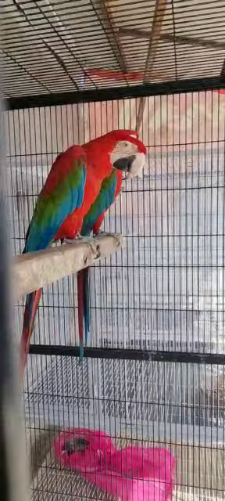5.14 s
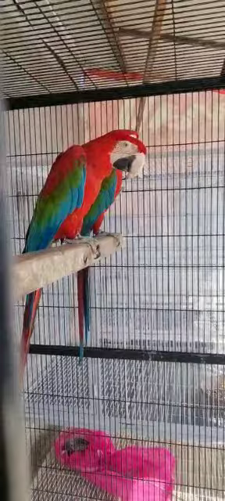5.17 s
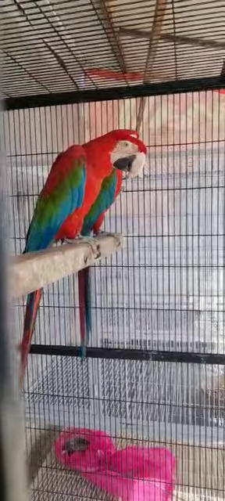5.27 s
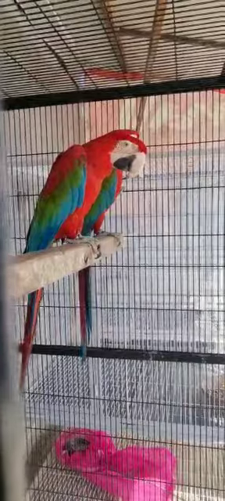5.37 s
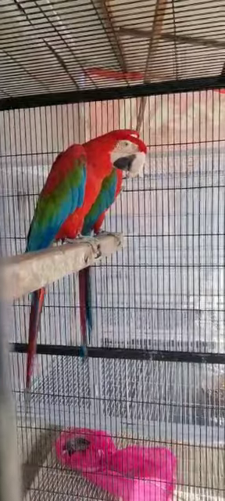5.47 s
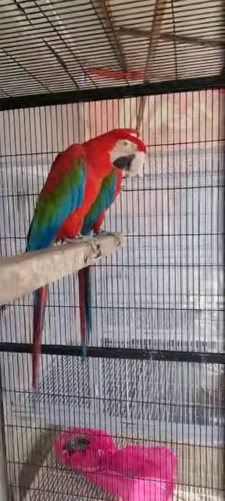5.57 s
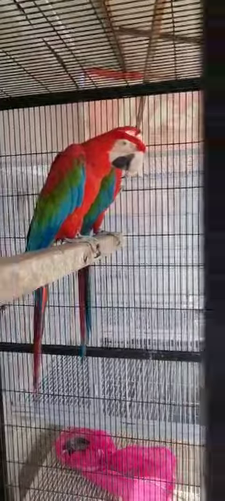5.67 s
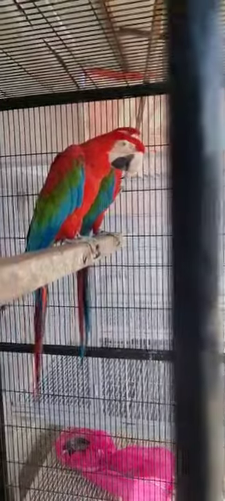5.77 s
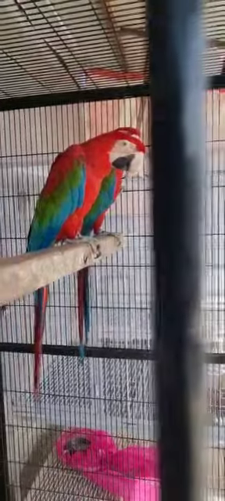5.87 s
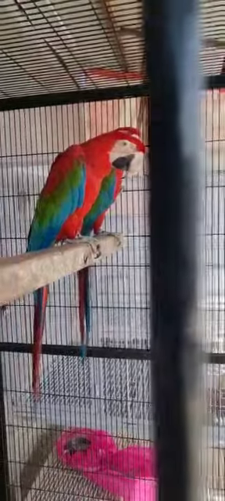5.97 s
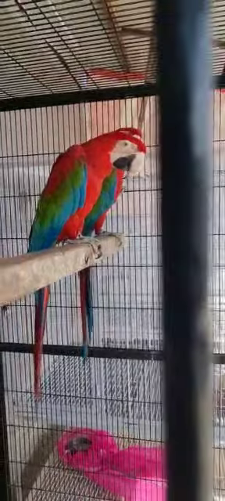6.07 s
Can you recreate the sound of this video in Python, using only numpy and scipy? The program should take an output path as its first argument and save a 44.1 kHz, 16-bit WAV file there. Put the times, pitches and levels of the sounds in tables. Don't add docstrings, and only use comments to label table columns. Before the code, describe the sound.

A large parrot lets out a string of loud, harsh, falling screeches in an echoing wire aviary, with growls, squawks, claw ticks and distant birds.

```python
import sys
import numpy as np
from scipy import signal
from scipy.fft import rfft, irfft, next_fast_len
from scipy.io import wavfile
from scipy.ndimage import map_coordinates

SR = 44100
rng = np.random.default_rng(int(sys.argv[2]) if len(sys.argv) > 2 else 0)


def dump_mix(stems):
    frames = np.atleast_2d(stems).T
    limited = np.clip(frames, -1, 1)
    pcm = np.round(limited * 32767).astype(np.int16)
    wavfile.write(sys.argv[1], SR, pcm)


def invert_db(level):
    return 10 ** (np.asarray(level, dtype=float) / 20)


N = 270769
TIME = np.arange(N) / SR

# (frequency [Hz], left-right correlation [-1 to 1])
PORT_LIKENESS = [(60, 1), (130, 0.73), (290, 0.68), (640, -0.64), (1400, 0.06), (3100, -0.11),
                 (7000, 0.091)]
# (frequency [Hz], t60 [s])
AVIARY_DECAY = [(200, 1), (1000, 0.41), (3000, 0.39), (7000, 0.25), (14000, 0.16)]

# (frequency [Hz], level [dB per Hz])
MURMUR_COLOUR = [(12, -67), (20, -34.5), (49, -21), (302, -4.5), (377, -3.5), (433, -8), (620, -8),
                 (693, -4.5), (753, -7.5), (966, -8.5), (1420, -5.5), (1640, -14.5), (1990, -12),
                 (2410, -12.5), (15000, -46.5)]
# (time [s], level [dB])
MURMUR_LEVEL = [(0, -58), (.8, -58.5), (1.4, -50), (2.6, -53), (3.5, -49), (4.8, -51), (5.13, -60),
                (5.54, -50), (6.14, -55)]
# (frequency [Hz], width [Hz], level [dB])
MOTOR_HUM = (76.2, 20, -59.5)
# (frequency [Hz], width [Hz], level [dB])
CHIRR_BANDS = [(2660, 570, 2), (3880, 300, -1), (5400, 350, 6.5), (6470, 730, 6)]
# (time [s], level [dB])
CHIRR_CRESTS = [(0, -43.5), (.8, -38.5), (1.4, -51), (2.25, -38), (2.6, -30), (3.6, -35), (4.2, -40),
                (5.1, -29)]

# (time [s], length [s], peak level [dB], first pitch [Hz], last pitch [Hz])
WHISTLE_CALLS = [
    (3.463, .1, -22, 3200, 2950),
    (4.165, .09, -22, 3100, 2850),
    (4.875, .105, -20, 2980, 2870),
    (2.8, .07, -28, 4200, 3750),
    (2.87, .2, -33, 1950, 1900),
    (2.835, .13, -25, 3500, 3060),
    (-.1, .25, -45, 1400, 1420),
    (3.85, .45, -45, 1480, 1440),
]
# (second harmonic [dB], pitch unsteadiness [share])
WHISTLE_GRAINS = [(-17, 0.021), (-21, 0.014), (-25, 0.016), (-44, 0.02), (-0.5, 0.073), (-19.5, .015),
                  (-15, 0.03), (-5, .05)]
# (crest [share of length], start under crest [dB], end under crest [dB])
WHISTLE_SWELL = (.45, 20, 12)

# (time [s], peak level [dB], dull band re bright [dB], left-right [dB])
MESH_TICKS = [(0.0807, -50, 7, 1.0), (0.194, -47, 5, 3.0), (0.313, -44.5, 7, 2), (0.632, -49, 6, 2.0),
              (0.6705, -31, -3.5, -4), (0.8213, -60, 23, 1.5), (0.9003, -68.5, 34, -7),
              (1.8992, -54, 19, 12), (2.045, -37.5, -14, 10), (2.1972, -35, 4.5, 3), (2.3001, -48.5, -4, 1),
              (2.4782, -41, 7, -19), (2.8492, -42, 14.5, 0), (3.25, -44, 5, 10), (3.469, -40, 9, -2),
              (3.8076, -34.5, 2, -12), (3.8513, -34, 2, -5), (3.88, -38, 8, -3), (4.11, -46, -5, 0),
              (6.0201, -56, 0, 0)]
# (frequency [Hz], level [dB])
WIRE_BRIGHT = [(7500, -47), (9000, -12.5), (13000, -7.5), (16000, -9.5)]
# (frequency [Hz], level [dB])
WIRE_DULL = [(1200, -23), (2500, -20), (5500, -10), (7200, -12), (8200, -33)]
# (time [s], peak level [dB], t60 [s])
DRY_SNAP = (5.6434, -30, .006)

# (time [s], length [s], peak level [dB], first pitch [Hz], settled pitch [Hz])
CLEAN_SCREECHES = [(1.137, .263, -16.5, 1790, 1395), (1.468, .4, -16.5, 1570, 1385),
                   (2.588, .232, -19.5, 1430, 1375), (2.975, .295, -19, 1480, 1365)]
# (time [s], length [s], peak level [dB], first pitch [Hz], settled pitch [Hz])
TORN_SCREECHES = [(3.497, .44, -20.5, 1380, 1330), (4.188, .41, -19, 1430, 1345),
                  (4.905, .39, -18, 1450, 1355)]
# (time to crest [s], start under crest [dB], fade [dB/s], left-right [dB])
CLEAN_SWELL = (.12, 6, 95, -1)
TORN_SWELL = (.03, 1, 45, 0)
# (time to full rasp [s], first roughness [0-1], full roughness [0-1],
#           half-pitch lines [dB], left lag [samples])
CLEAN_TEARING = (.12, .03, .4, -13, 19)
TORN_TEARING = (.05, .3, .58, -8, -6)
# (frequency [Hz], level [dB])
BEAK_THROAT = [(650, -74), (1100, -22), (1450, -18), (1800, -19), (2360, -3), (2850, -3), (3600, -5),
               (4360, -22.5), (5030, -18), (5730, -12), (9370, -63), (11200, -52), (15000, -35)]
# (frequency [Hz], level [dB])
WIDE_RASP = [(530, -31.5), (900, -55), (1190, -6.5), (1660, -9), (1930, -2.5), (2390, 1.5), (2690, 3),
             (3970, -8.5), (4510, -18), (5390, -12), (6820, -17), (8430, -39.5), (15000, -41)]
# (frequency [Hz], level [dB])
NARROW_RASP = [(530, -61.5), (900, -34), (1410, -26), (1960, -11), (2310, -19), (2720, -1.5), (3130, -10.5),
               (4730, -23), (5580, -25), (7490, -35.5), (8230, -63), (11600, -52), (15000, -55)]

# (time [s], length [s], peak level [dB], first pitch [Hz], last pitch [Hz])
DRONE_CALLS = [(1.38, .57, -44, 470, 500), (2.7, 1.25, -41, 480, 512), (4.0, .6, -42, 580, 620),
               (4.63, .32, -35, 760, 630), (4.94, .75, -27.5, 530, 570), (5.74, .06, -35, 560, 540),
               (5.78, .32, -44, 560, 520)]
# (crest [share of length], start under crest [dB], end under crest [dB])
DRONE_SWELL = (.6, 7, 7)
# (frequency [Hz], level [dB])
FAR_THROAT = [(140, -57.5), (230, -20), (314, -14), (398, -21.5), (490, -3), (777, -5), (1110, 2),
              (1660, -1), (2170, -22.5), (2750, -5), (3230, -26), (4100, -18), (4480, -30), (5360, -17.5),
              (8000, -70), (10400, -75.5), (17600, -120)]
# (time [s], length [s], peak level [dB], crest [share of length], start under crest
# [dB], end under crest [dB])
RINGING_CALL = (5.2, .51, -26, .75, 6, 11)

# (time [s], level [dB], pitch [Hz])
GROWL_CURVE = [(1.82, -42, 335), (1.982, -36, 374), (2.036, -37.5, 312), (2.13, -33, 320),
               (2.166, -33, 376), (2.21, -29, 385), (2.248, -28, 448), (2.27, -34, 437)]
# (time [s], length [s], first pitch [Hz], last pitch [Hz], roughness [0-1])
SQUAWK_PARTS = [
    (2.26, .092, 630, 620, .3),
    (2.345, .071, 580, 550, .12),
    (2.41, .055, 540, 500, .15),
    (2.465, .095, 650, 440, .38),
]
# (time [s], level [dB])
SQUAWK_EFFORT = [(2.26, -38), (2.29, -25), (2.345, -22), (2.37, -18), (2.42, -14.5), (2.46, -21),
                 (2.475, -13), (2.515, -18), (2.56, -36)]
# (time [s], length [s], level [dB], first pitch [Hz], last pitch [Hz])
CLOSING_CALL = (6.085, .055, -27.5, 505, 525)
# (frequency [Hz], level [dB])
GROWL_THROAT = [(120, -73), (200, -21), (333, -7), (475, -17.5), (646, -8.5), (766, -15), (1030, 1),
                (1510, -19), (2980, -16.5), (3530, -35.5), (6250, -34.5), (8000, -54), (10400, -80),
                (17600, -120)]
# (frequency [Hz], level [dB])
CROAK_THROAT = [(180, -49), (300, -17.5), (691, -16.5), (828, -25), (1190, 2), (1540, -8), (1910, -5.5),
                (2480, -11.5), (3120, -24), (3380, -26), (15000, -48.5)]
# (frequency [Hz], level [dB])
OPEN_THROAT = [(300, -18), (560, -13), (800, -1), (1040, 7.5), (1420, 1), (1880, -7.5), (2170, 1.5),
               (2520, -6.5), (3170, 2), (4620, -22), (5800, -18), (8600, -45.5), (13400, -30.5),
               (15000, -37.5)]
# (frequency [Hz], level [dB])
CLOSING_THROAT = [(180, -35), (300, -9), (594, -6), (790, -6), (1030, 3), (2140, -30), (3100, -4),
                  (5390, -42), (6770, -33), (9000, -96), (11700, -126), (19800, -120)]

# (time [s], length [s], peak level [dB])
TRILL_CALLS = [(4.62, .26, -53), (5.45, .69, -51)]
# (frequency [Hz], width [Hz], level [dB])
TRILL_BUZZ = [(5400, 250, -4), (6540, 300, 4)]
# (crest [share of length], start under crest [dB], end under crest [dB])
TRILL_SWELL = (.42, 14, 10)


def unit(x):
    return x / np.sqrt(np.mean(x ** 2) + 1e-20)


def along(points, hz):
    f, value = np.transpose(points)
    return np.interp(np.log(hz + 1), np.log(f + 1), value)


def follow(points, t, outside=None):
    return np.interp(t, *np.transpose(points), left=outside, right=outside)


def wobble(rate, size=N):
    knots = rng.standard_normal(int(size * rate / SR) + 4)
    return map_coordinates(knots, [np.arange(size) * rate / SR])


def resonance(hz, centre, width):
    return 1 / (1 + (2 * (hz - centre) / width) ** 2)


def filtered(x, response):
    size = x.shape[-1]
    m = next_fast_len(size + 8192)
    return irfft(rfft(x, m) * response(np.fft.rfftfreq(m, 1 / SR)), m)[..., :size]


def diffuse(size, gain):
    def mid_side_gain(hz):
        turn = np.arccos(np.clip(along(PORT_LIKENESS, hz), -1, 1)) / 2
        return gain(hz) * np.array([np.cos(turn), np.sin(turn)])

    mid, side = filtered(rng.standard_normal((2, size)), mid_side_gain)
    return unit(np.array([mid + side, mid - side]))


def heard(x, s, lag, pan_db, wet_db):
    hz, t, bins = signal.stft(diffuse(SR * 2 // 5, np.ones_like), SR, nperseg=256)
    decay = invert_db(-60 * t / along(AVIARY_DECAY, hz)[:, None])
    tail = signal.istft(bins * decay, SR, nperseg=256)[1]
    tail = tail / np.linalg.norm(tail[0])
    path = invert_db(wet_db) * np.pad(tail, ((0, 0), (160, 0)))
    path[[0, 1], [20 + int(lag), 20]] += invert_db([pan_db / 2, -pan_db / 2])
    sound = signal.fftconvolve(x[None], path, axes=1)[:, 20:] / np.sqrt(1 + invert_db(2 * wet_db))
    out, start = np.zeros((2, N)), round(s * SR)
    out[:, start:start + sound.shape[1]] = sound[:, :N - start]
    return out


def arch(s, length, db, crest, first_db, last_db):
    return [(s, db - first_db), (s + crest * length, db), (s + length, db - last_db)]


def swell(t, s, db):
    ends = np.minimum(t - t[0], t[-1] - t) / 0.0028
    return invert_db(np.interp(t, s, db)) * np.minimum(1, ends)


def yard():
    murmur_db = follow(MURMUR_LEVEL, TIME) + 7 + 0.4 * wobble(2.67)
    murmur = diffuse(N, lambda f: invert_db(along(MURMUR_COLOUR, f))) * invert_db(murmur_db)
    hum_hz, hum_width, hum_db = MOTOR_HUM
    hum = diffuse(N, lambda f: resonance(f, hum_hz, hum_width)) * invert_db(hum_db)
    chirr = diffuse(N, lambda f: sum(invert_db(db) * resonance(f, c, w) for c, w, db in CHIRR_BANDS))
    rise, fade = 90, 40
    crests = [db - np.maximum(rise * (s - TIME), fade * (TIME - s)) for s, db in CHIRR_CRESTS]
    chirr_db = np.max(crests, axis=0) - 11 + 3.5 * wobble(27)
    return murmur + hum + chirr * invert_db(chirr_db)


def whistles():
    out, dive_s = 0, .03
    for call, (octave_db, unsteady) in zip(WHISTLE_CALLS, WHISTLE_GRAINS):
        start, length, peak_db, first_hz, last_hz = call
        s, db = np.transpose(arch(start, length, peak_db, *WHISTLE_SWELL))
        t = np.arange(max(start, 0), s[-1], 1 / SR)
        hz = last_hz + (first_hz - last_hz) * np.exp(-(t - start) / dive_s)
        hz = hz * (1 + unsteady * wobble(200, size=len(t)))
        phase = 2 * np.pi * np.cumsum(hz) / SR
        tone = np.sin(phase) + invert_db(octave_db) * np.sin(2 * phase)
        out = out + heard(tone * swell(t, s, db), t[0], -5.5, -.6, wet_db=-5.0)
    return invert_db(7.5) * out


def ticks():
    out, t = 0, np.arange(SR // 6) / SR
    for s, db, dull_db, pan_db in MESH_TICKS:
        rattle = rng.standard_normal((2, len(t)))
        bright = unit(filtered(rattle[0], lambda f: invert_db(along(WIRE_BRIGHT, f))))
        dull = unit(filtered(rattle[1], lambda f: invert_db(along(WIRE_DULL, f))))
        shiver = invert_db(-60 * t / 0.0069) + 0.15 * invert_db(-60 * t / 0.39)
        tick = invert_db(db + 7) * shiver * (bright + invert_db(dull_db) * dull)
        out = out + heard(tick, s, 3, pan_db, wet_db=8)
    snap_s, snap_db, snap_t60 = DRY_SNAP
    t = t[:SR // 50]
    snap = rng.standard_normal(len(t)) * invert_db(snap_db - 60 * t / snap_t60)
    return out + heard(snap, snap_s, 3, 0, wet_db=-6)


def voice(rows, pitch, rough, throat, rasp, half_db, flutter_hz, jitter):
    s, db = np.transpose(rows)[:2]
    t = np.arange(s[0], s[-1], 1 / SR)
    rough = np.clip(rough(t - s[0]) if callable(rough) else rough + 0 * t, 0, 1)
    hz = follow(pitch, t)
    phase = 2 * np.pi * np.cumsum(hz * (1 + jitter * rough * wobble(350, size=len(t)))) / SR
    tone = np.zeros(len(t))
    halves = invert_db(half_db) * np.clip(6 * rough - .6, 0, 1)
    for k in np.arange(1, 2 * 15000 / hz.max()) / 2:
        if along(throat, k * hz.min()) > -50:
            alternate = 1 if k % 1 == 0 else halves
            gain = np.repeat(invert_db(along(throat, k * hz[::64])), 64)[:len(t)]
            tone += alternate * gain * np.cos(k * phase + rng.uniform(0, 2 * np.pi))
    air = unit(filtered(rng.standard_normal(len(t)), lambda f: invert_db(along(rasp, f))))
    flutter = invert_db(5 * rough * wobble(flutter_hz, size=len(t)))
    mix = np.sqrt(1 - rough) * unit(tone) + np.sqrt(rough) * air
    return unit(mix * flutter) * swell(t, s, db)


def screech(call, shape, tearing, rasp):
    s, length, db, first_hz, rest_hz = call
    crest, under_db, fade, pan_db = shape
    tear, clean, torn, half_db, lag = tearing
    onset_s, onset_db = .005, 16
    rows = [(s, db - under_db - onset_db), (s + onset_s, db - under_db),
            (s + crest, db), (s + length, db - fade * (length - crest))]
    flick_s, slide_s, sag = .009, .12, 90
    age = np.linspace(0, length, num=60)
    fall = np.exp(-age / flick_s) + np.maximum(1 - age / slide_s, 0)
    pitch = np.transpose([s + age, rest_hz + (first_hz - rest_hz) / 2 * fall - sag * age])
    rough = lambda t: np.interp(t, [.38 * tear, .45 * tear, tear], [clean, (clean + torn) / 2, torn])
    sound = voice(rows, pitch, rough, BEAK_THROAT, rasp, half_db, 160, .06)
    return heard(sound, s, lag, pan_db, wet_db=1)


def screeches():
    clean = sum(screech(call, CLEAN_SWELL, CLEAN_TEARING, NARROW_RASP) for call in CLEAN_SCREECHES)
    torn = sum(screech(call, TORN_SWELL, TORN_TEARING, WIDE_RASP) for call in TORN_SCREECHES)
    return clean + torn


def far_bird():
    out = 0
    for s, length, db, first_hz, last_hz in DRONE_CALLS:
        rows = arch(s, length, db, *DRONE_SWELL)
        pitch = [(s, first_hz), (s + length, last_hz)]
        drone = voice(rows, pitch, .5, FAR_THROAT, FAR_THROAT, -18, 60.15, .12)
        out = out + heard(drone, s, -11, -7.7, wet_db=3.5)
    ring = diffuse(N, lambda f: resonance(f, 2720, 240) + 0.17 * resonance(f, 4100, 300))
    ring_db = follow(arch(*RINGING_CALL), TIME, outside=-120) - 2.5 + 1.9 * wobble(60)
    return invert_db(3) * out + invert_db(ring_db) * ring


def near_bird():
    growl_pitch = np.array(GROWL_CURVE)[:, ::2]
    growl = voice(GROWL_CURVE, growl_pitch, 0.348, GROWL_THROAT, GROWL_THROAT, -17, 72.4, 0.0945)
    out = heard(growl, GROWL_CURVE[0][0], 18.4, -3.5, wet_db=0.5)

    def squawk(rows, s, length, first_hz, last_hz, rough, throat):
        pitch = [(s, first_hz), (s + length, last_hz)]
        return heard(voice(rows, pitch, rough, throat, throat, -16, 90, .09), s, 19, -3.5, wet_db=-7)

    throats = [CROAK_THROAT, OPEN_THROAT, OPEN_THROAT, OPEN_THROAT]
    for (s, length, first_hz, last_hz, rough), throat in zip(SQUAWK_PARTS, throats):
        t = np.linspace(s, s + length, num=30)
        rows = np.transpose([t, follow(SQUAWK_EFFORT, t)])
        out += squawk(rows, s, length, first_hz, last_hz, rough, throat)
    s, length, db, first_hz, last_hz = CLOSING_CALL
    rows = arch(s, length, db - 4, .3, 24, -4)
    out += squawk(rows, s, length, first_hz, last_hz, .15, CLOSING_THROAT)
    return invert_db(4.5) * filtered(out, lambda f: 1 / (1 + (270 / (f + 1)) ** 6))


def trill():
    rate = 17 * (1 + 0.17 * wobble(6))
    beat = (.5 + .5 * np.cos(2 * np.pi * np.cumsum(rate) / SR)) ** 2
    buzz = diffuse(N, lambda f: sum(invert_db(db) * resonance(f, c, w) for c, w, db in TRILL_BUZZ))
    level = sum(invert_db(follow(arch(*call, *TRILL_SWELL), TIME, outside=-120)) for call in TRILL_CALLS)
    return invert_db(4) * level * (0.3 + beat) * buzz


def scene():
    calls = whistles() + screeches() + far_bird() + near_bird() + trill()
    return (yard() + ticks() + calls) * invert_db([[-.4], [.4]])


def band_limit(x):
    return signal.sosfilt(signal.butter(12, 15730, fs=SR, output="sos"), x)


def record(dry):
    mix = dry / (1 + np.abs(dry / 1.05) ** 8) ** (1 / 8)
    return band_limit(mix)


dry = scene()
out = record(dry)
dump_mix(out)
```